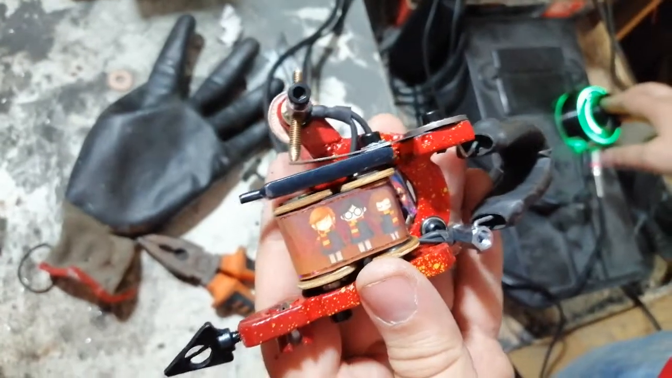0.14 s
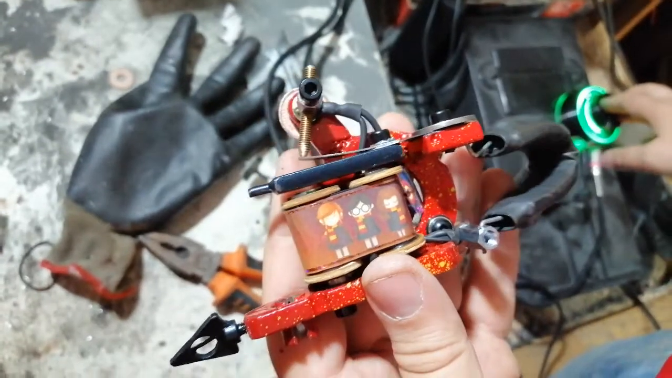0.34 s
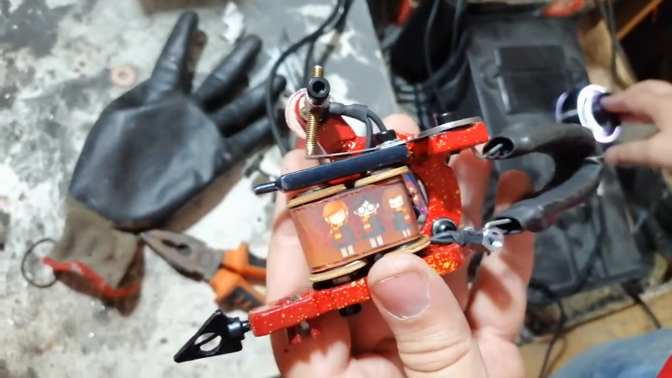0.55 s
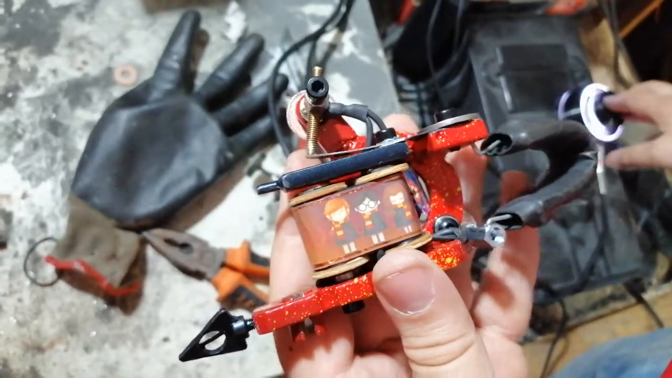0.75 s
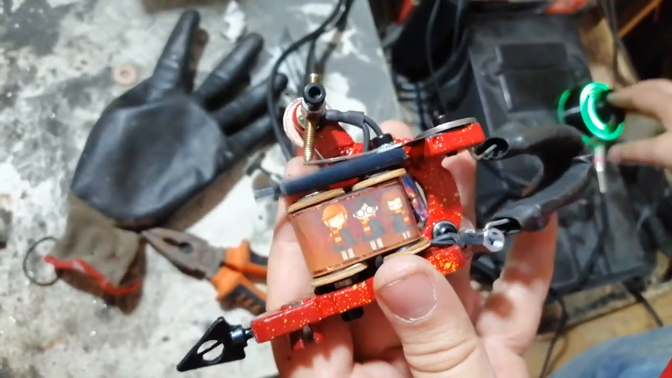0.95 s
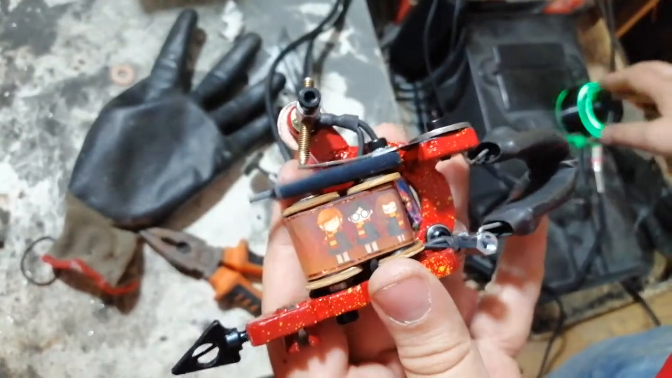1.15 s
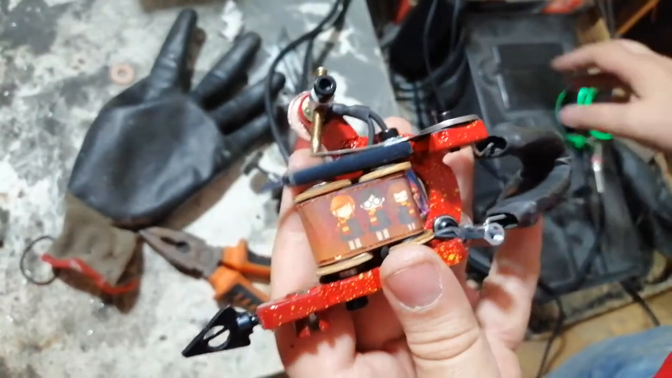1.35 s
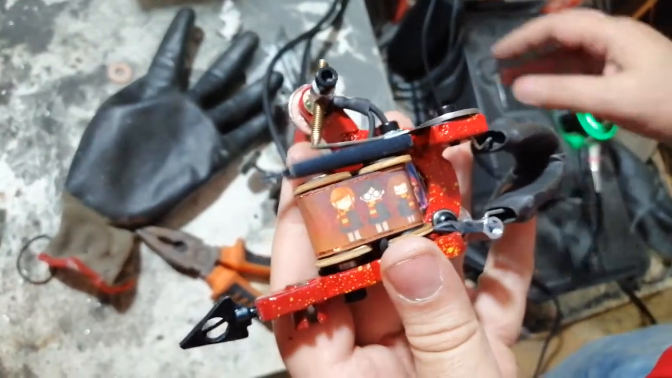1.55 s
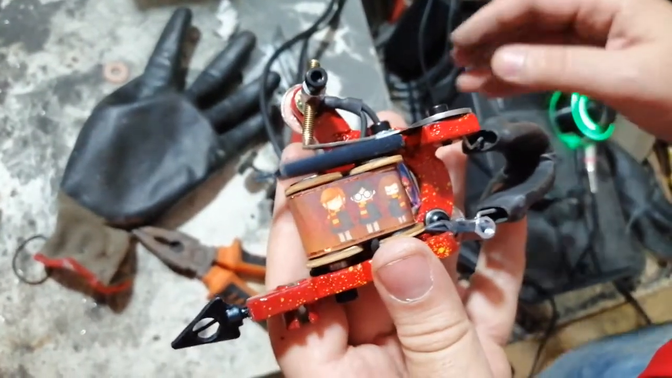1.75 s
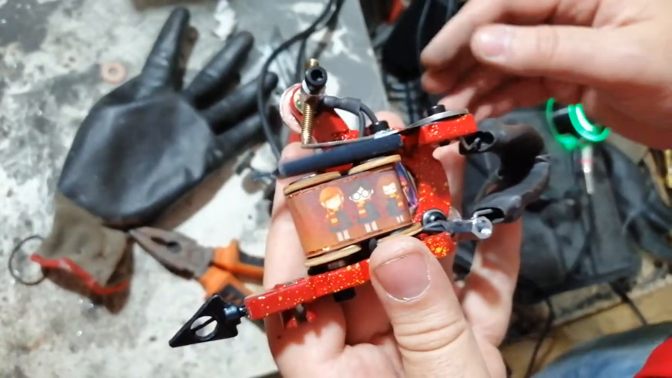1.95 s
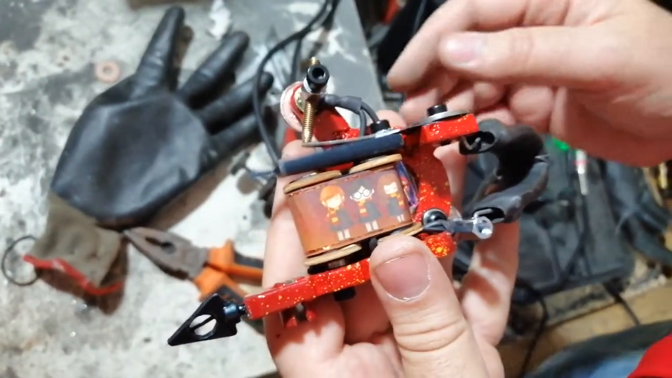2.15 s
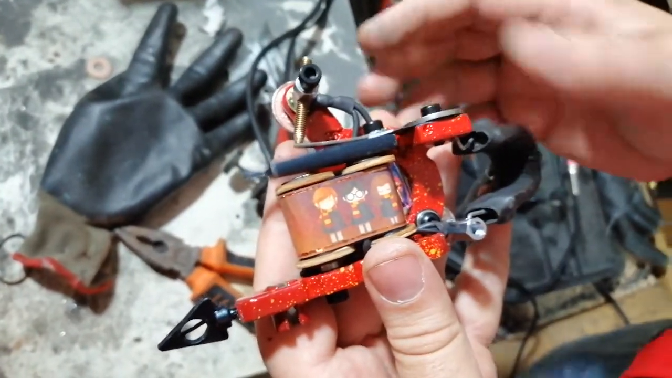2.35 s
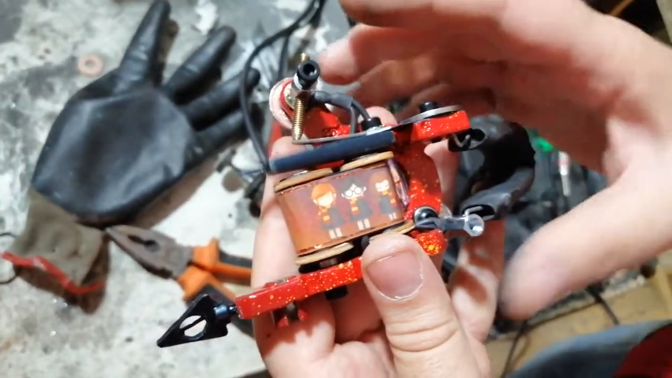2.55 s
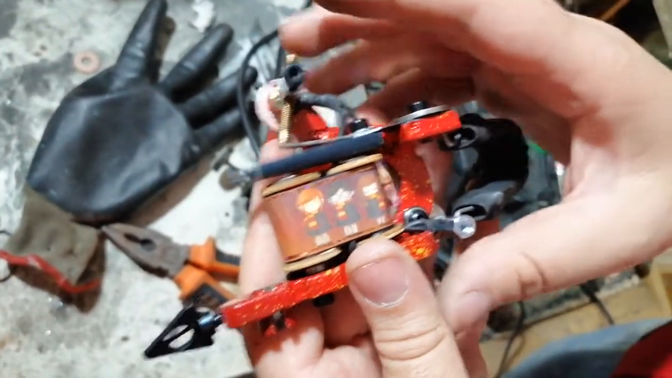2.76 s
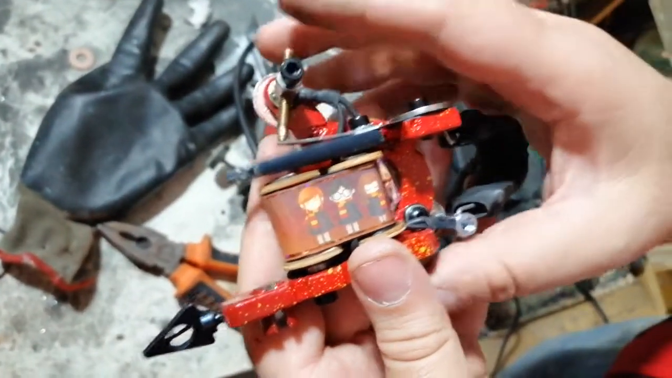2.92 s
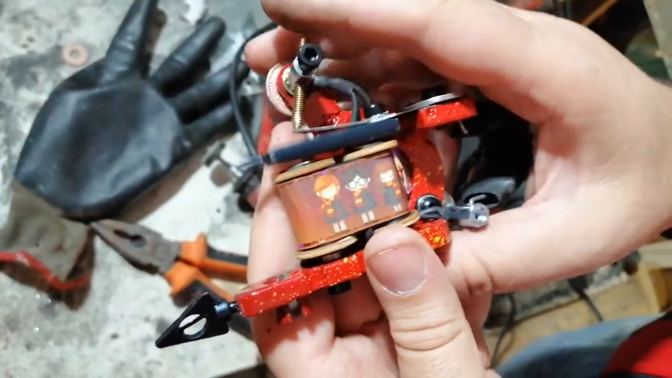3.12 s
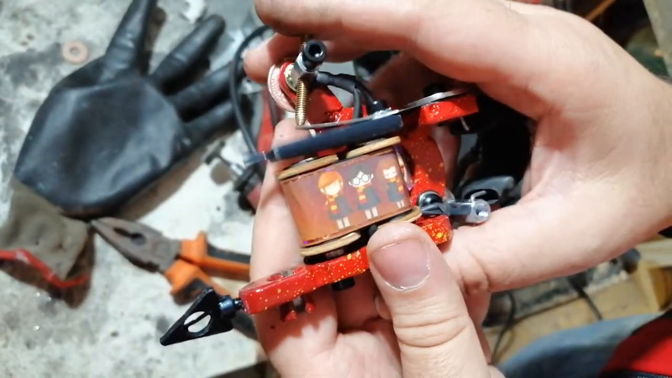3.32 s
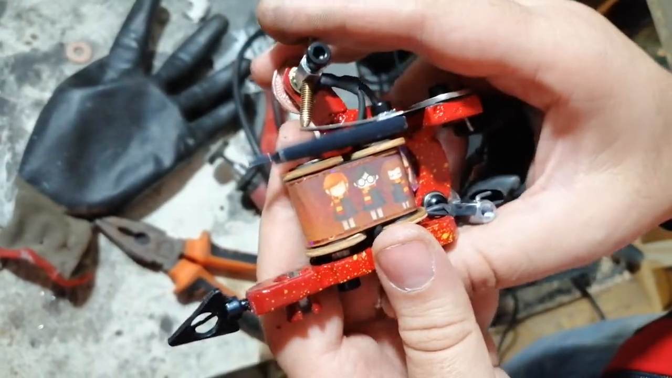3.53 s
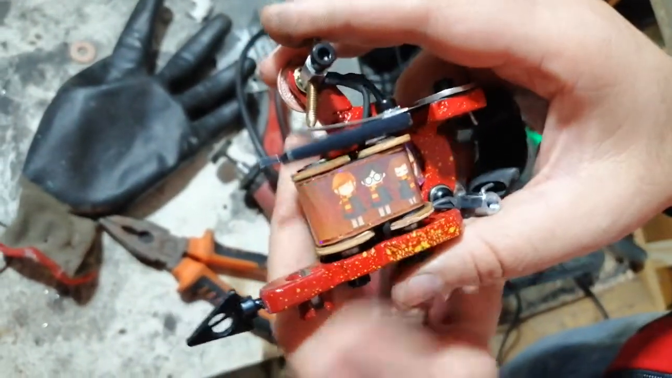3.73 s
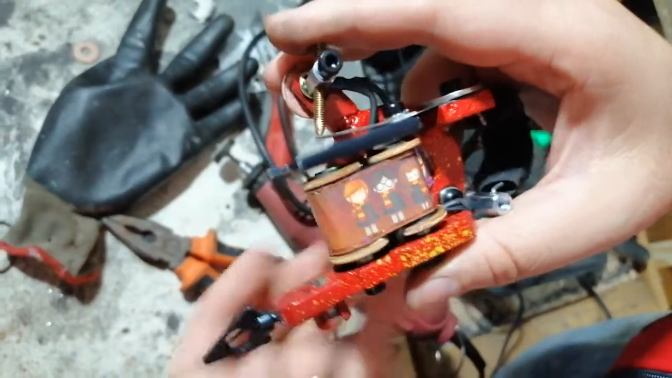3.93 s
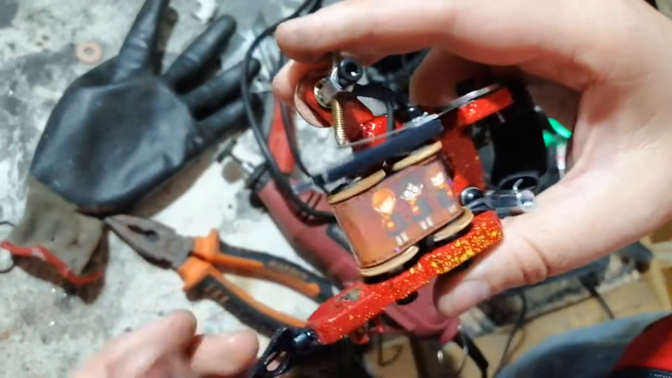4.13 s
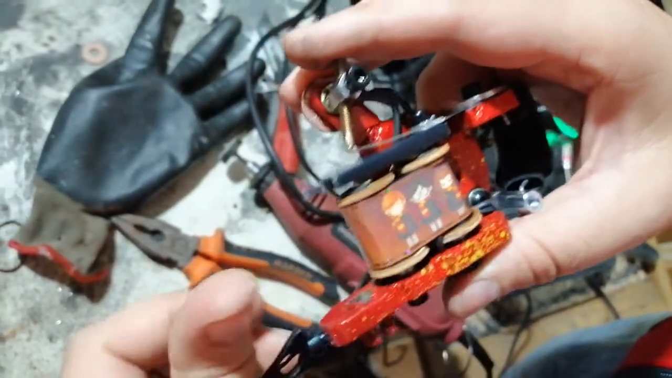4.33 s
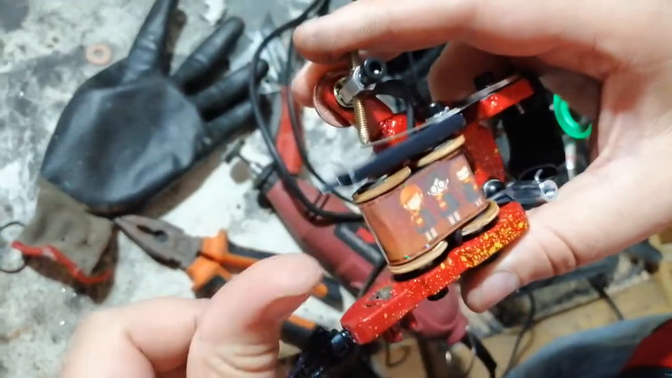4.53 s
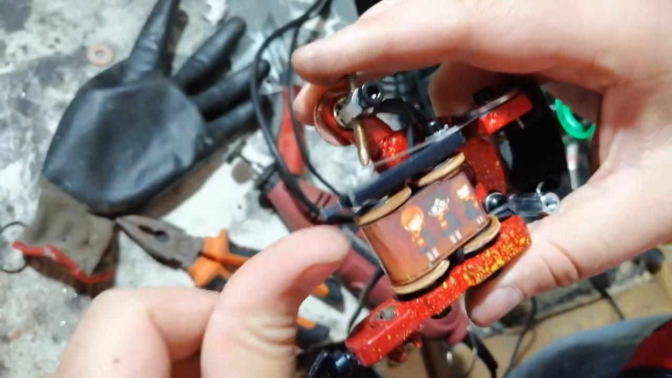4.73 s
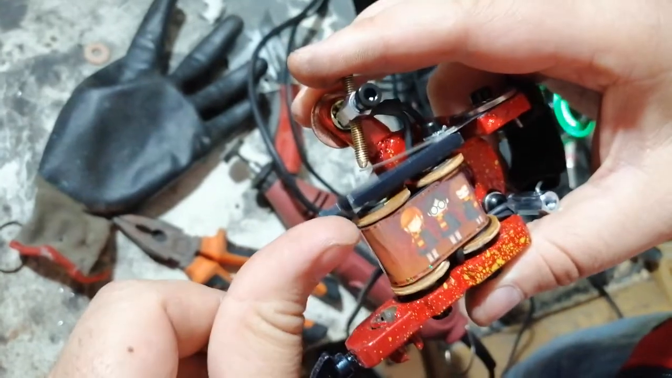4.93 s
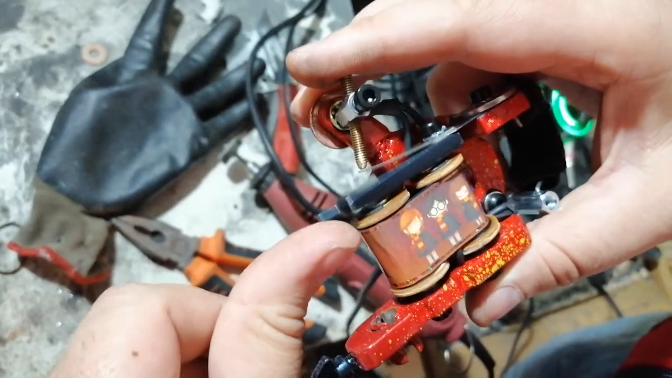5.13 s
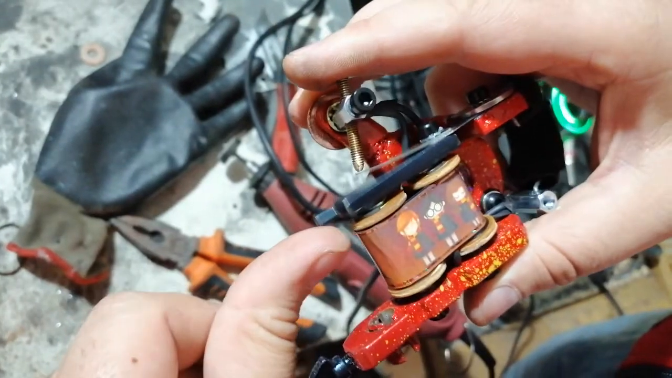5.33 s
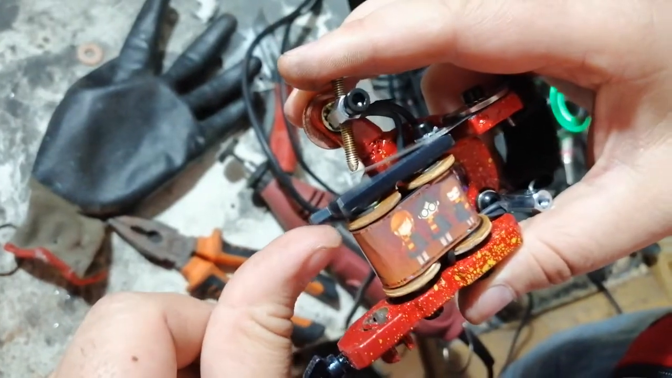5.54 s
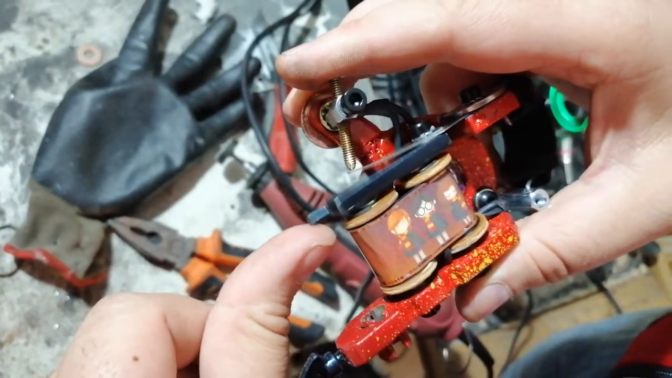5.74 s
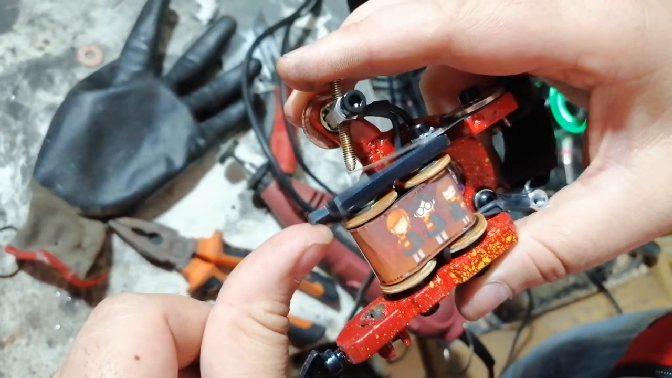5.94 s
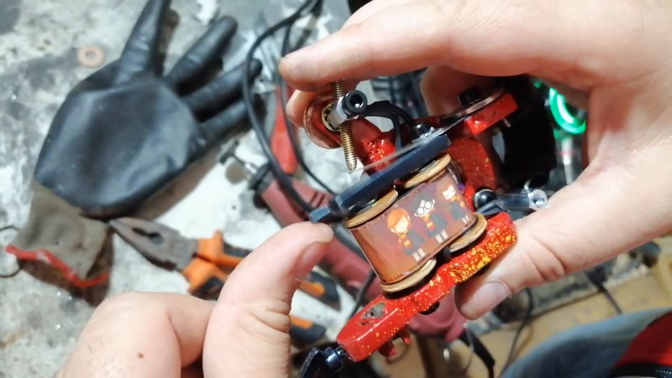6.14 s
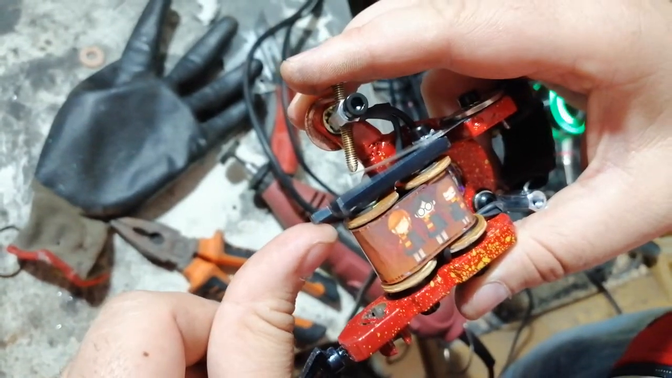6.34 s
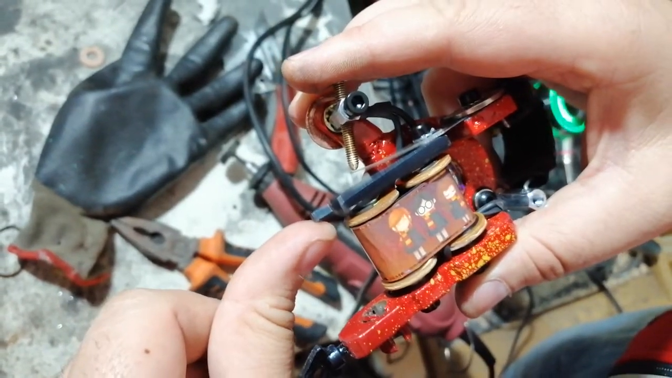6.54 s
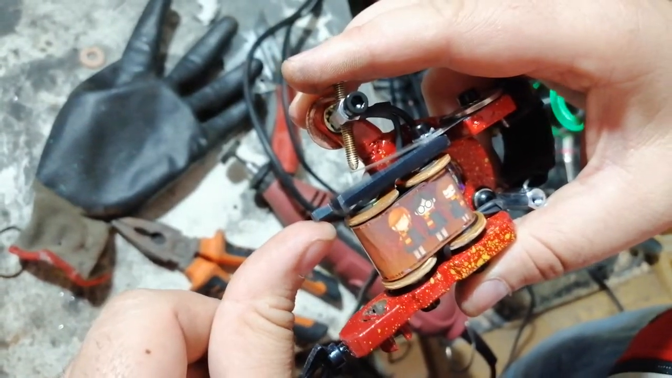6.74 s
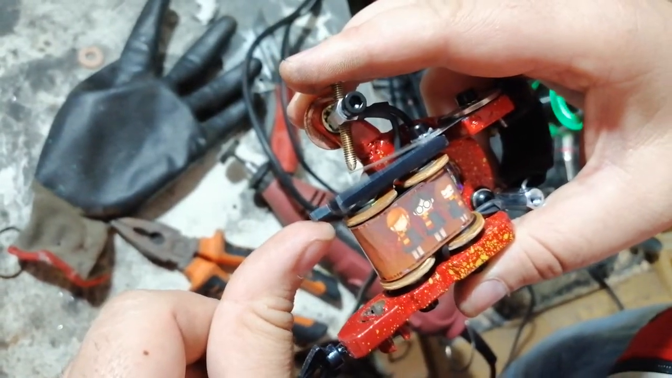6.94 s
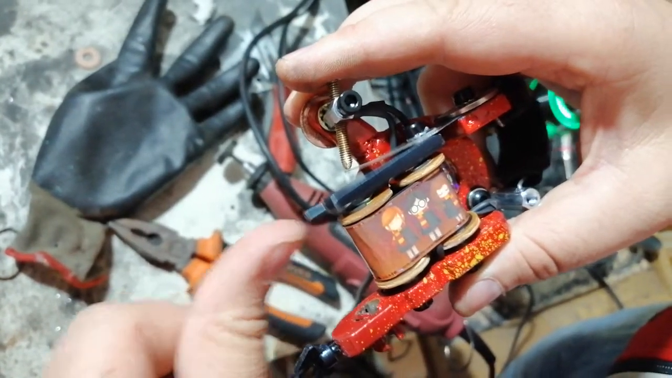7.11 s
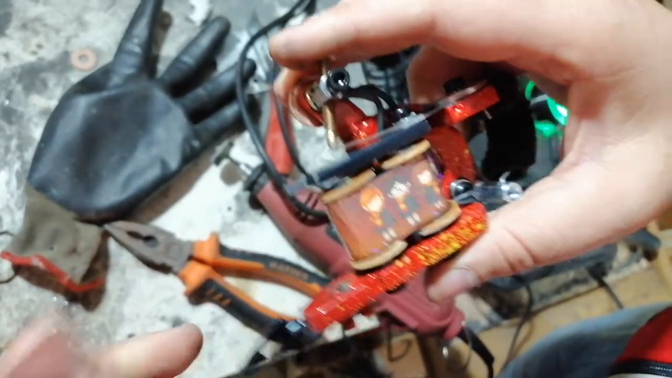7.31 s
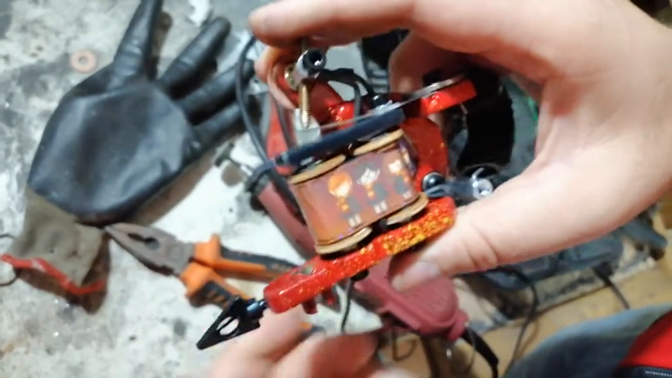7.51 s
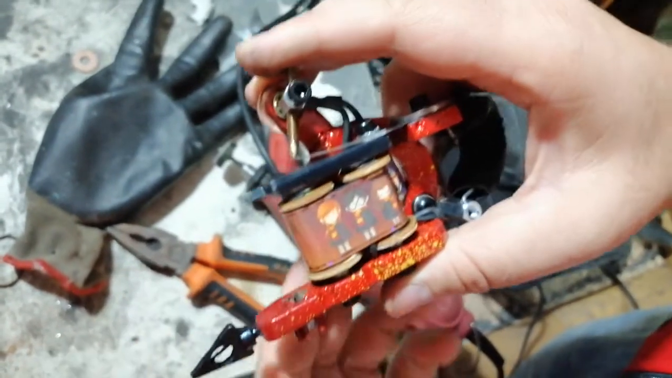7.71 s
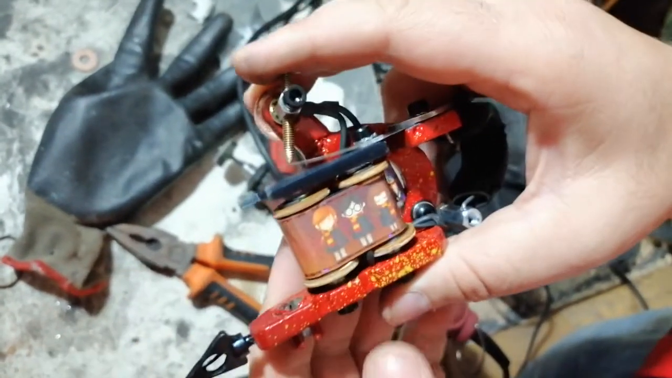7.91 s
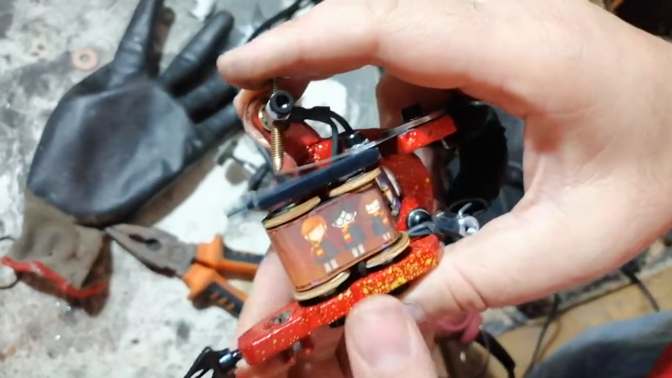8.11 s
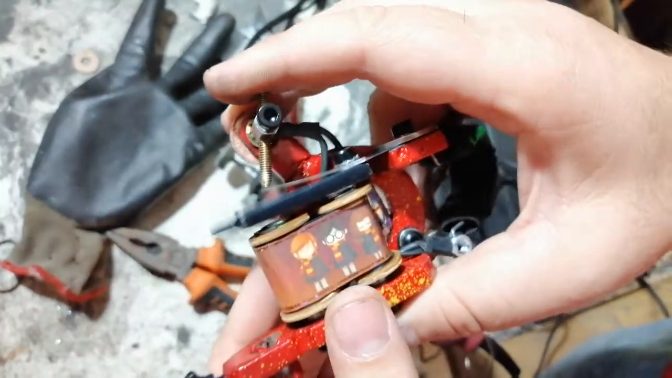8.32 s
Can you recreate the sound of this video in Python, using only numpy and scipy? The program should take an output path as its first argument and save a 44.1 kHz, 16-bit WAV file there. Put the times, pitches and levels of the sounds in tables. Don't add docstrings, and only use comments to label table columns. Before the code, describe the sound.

After soft button clicks, a handheld coil tattoo machine kicks on with a harsh metallic buzz, gets briefly bogged down by a thumb, then recovers.

```python
import sys
import numpy as np
from scipy import signal
from scipy.fft import rfft, irfft, next_fast_len
from scipy.io import wavfile

SR = 44100
rng = np.random.default_rng(int(sys.argv[2]) if len(sys.argv) > 2 else 0)


def digitize_waveform(pressure):
    field = np.atleast_2d(pressure).T
    bounded = np.clip(field, -1, 1)
    quanta = np.round(bounded * 32767).astype(np.int16)
    wavfile.write(sys.argv[1], SR, quanta)


def attenuation_scalar(level_db):
    decades = np.asarray(level_db, float) / 20
    return 10 ** decades


N = 373527
FIRST_BLOW_S = .9822


def machine():
    # (delay [ms], left [dB], right [dB], timing scatter [ms], size scatter [dB])
    contacts = [
        (0, -4.5, -15, 0.003, 1.5),
        (0.221, 3, 16, 0.0023, 0.5),
        (0.411, -9, 7, .004, 2),
        (0.6, 0, -4, 0.01, 2.5),
        (1.205, -0.5, -23, 0.0086, 2),
        (2.652, -2, 5.5, 0.0018, 1),
        (3.497, -4.5, -18, 0.011, 0.5),
    ]
    # (frequency [Hz], width [Hz], left [dB], right [dB], slope [dB per dB of turn])
    clang = [(2123, 390, -13, -21, 1.02), (3777, 345, -3.5, -41, -0.57), (5070, 2100, -16, -32, -2),
             (5690, 230, -21, -16, -1.5), (6947, 730, -39, 6.5, 0), (7810, 490, -2.5, -9, 1.22),
             (9410, 1720, -20, 7, 0.5), (10250, 1260, -11, -1, -.2), (11720, 2100, -4.5, -34, 0.6),
             (13460, 1960, -2, -39, -0.4), (14750, 910, -7.5, -17, 0.5)]
    # (frequency [Hz], width [Hz], left [dB], right [dB], slope [dB per dB of turn])
    frame_rings = [(959.2, 73, -2, 2, 0.36), (1198, 520, -7.5, -2.5, 1.18), (2050, 244, -7.5, 8.5, 0.3),
                   (2756, 180, -1.5, 3, -1), (3506, 28, 6.5, 8, -1.45), (3760, 126, 8.5, -35, 1.34),
                   (4550, 190, -5.5, 7, 0.4), (7290, 87, 12, 24, 0.34), (7518, 275, 11.5, 19, 0.48),
                   (9770, 180, -21, 8, 2.1), (10330, 290, 2, 14, 0.73)]
    # (frequency [Hz], width [Hz], left [dB], right [dB], slope [dB per dB of turn])
    spring = [(11290, 214, 5.5, -10.5, 0.34), (12760, 120, -16, -17, -3), (3657, 116, -8, -22, 0.67)]
    # (frequency [Hz], left [dB], right [dB])
    small_modes = [(102, -4, -7), (1000, -20, -20), (2050, -10.5, -16.5), (2700, -12.5, -10),
                   (3740, -14, -9.5), (5940, -6.5, -12.5), (7250, -3.5, -4), (10980, -0.5, -1.5),
                   (12070, -8.5, -24), (14000, -9, -14), (15000, -10.5, -22), (15100, -14, -28),
                   (16000, -51, -55)]
    # (frequency [Hz], width [Hz], gain [dB])
    palm_hz, palm_width_hz, palm_db = (8790, 1100, 15.2)
    # (start [s], length [s], gain [dB], ramp [s])
    cupping = [
        (2.9, 5.8, 2.5, 0.28),
        (4.05, 1.4, 7, 0.17),
        (7.35, 1.3, 9.5, 0.24),
    ]
    # (start [s], length [s], gain [dB], ramp [s])
    free_spring = [
        (1, 1.78, 6, 0.13),
        (7.3, 1.3, 2.5, 0.11),
    ]
    free_hz = 123.03

    hz, clang_db, pan_db, thump_db, spring_db = motion()
    turn_db = thump_db[0] - thump_db[1]
    stroke_s, stumble_db, phase = strokes(hz)
    chance_time, chance_size = rng.standard_normal((2, len(contacts) + 1, len(stroke_s)))
    load = np.clip(free_hz - hz, 0, 20)
    rush = np.clip(hz - free_hz - 11, 0, 2)
    wobble = 1 + (0.11 * load + 0.75 * rush)[(stroke_s * SR).astype(int)]
    stroke_s = stroke_s + 0.011 * wobble * chance_time[-1] / 1000

    blows = []
    for k, (delay_ms, _, _, time_ms, size_db) in enumerate(contacts):
        when = stroke_s + (delay_ms + time_ms * wobble * chance_time[k]) / 1000
        blows.append(clicks(when, attenuation_scalar(stumble_db + size_db * wobble * chance_size[k])))
    blows[-2] = blows[-2] * attenuation_scalar(spans(free_spring))
    snap = 0.34 * blows[-2] + 1.24 * blows[-1]

    scatter_hz, *scatter_db = np.transpose(small_modes)
    swing = attenuation_scalar(thump_db[1] - 8.5 - 0.72 * load) * walk(4.9, 1.6) * np.sin(phase + 2.97)
    out = []
    for ear, side in enumerate((1, -1)):
        drive = sum(attenuation_scalar(row[1 + ear]) * blow for row, blow in zip(contacts, blows))
        rattle = ring(np.abs(drive), 94, 270) * rng.standard_normal(N)
        scatter = level(posed(drive, 0.013), 0) + level(rattle, -8.5)
        scatter = colour(scatter, scatter_hz, scatter_db[ear])

        steel = level(modes(drive, clang, ear, turn_db, 1.4, order=2), -3.5)
        steel = steel + level(modes(drive, frame_rings, ear, turn_db, 0.49), -11.0)
        steel = steel + level(scatter, -4.5)
        steel = steel + attenuation_scalar(spring_db + 22) * modes(snap, spring, ear, turn_db, 0.43)
        if ear == 0:
            cupped = ring(ring(drive, palm_hz, palm_width_hz), palm_hz, palm_width_hz)
            steel = steel + attenuation_scalar(palm_db + spans(cupping)) * cupped
        steel = signal.lfilter(*signal.butter(2, 520, "high", fs=SR), steel)
        steel = np.roll(steel, ear * int(.00015 * SR))

        push = thump(blows[0] + (.25, .04)[ear] * blows[3] + (.4, .26)[ear] * blows[-2], ear)
        push_db = thump_db[ear] - 0.13 * load + (.2, 1.8)[ear] * rush
        port = attenuation_scalar(2.5 + side * pan_db / 2) * steel - side * attenuation_scalar(push_db) * push + swing
        out.append(attenuation_scalar(clang_db) * port)
    return np.array(out)


def motion():
    # (time [s], clang level [dB], left minus right [dB], thump over clang [dB],
    # turn of the bar's face to the left [dB])
    hold = [(1.0, -44, -7, -14.5, -4.5), (1.055, -42, -6, -12.5, -6.5), (1.1, -42, -2, -15.5, -4.5),
            (1.25, -40.5, -4, -14.5, -7), (1.8, -40, -3, -15.5, -7), (2.5, -39.5, -1.5, -15.5, -7),
            (2.9, -39.5, -0.5, -12.5, -4.5), (3.4, -37.5, 1.5, -14, 2.5), (3.65, -38.5, 2.5, -14, 2.5),
            (3.9, -41.5, 2, -11, 2.5), (4.5, -41.5, 2, -12.5, 6), (5.2, -41, 1, -12.5, 2),
            (5.8, -42, 2.5, -17, 4.5), (6.5, -41, 2.5, -18.5, 5), (7.0, -42, 1.5, -19.5, 5),
            (7.3, -40.5, 1, -11.5, 3.5), (7.7, -40.5, -1.5, -13.5, -1.5), (7.9, -38.5, -3, -15.5, -4.5),
            (8.2, -39.5, -2.5, -13.5, -3), (8.47, -41, -6, -12.5, 8)]
    # (start [s], length [s], drop in stroke rate [Hz], ramp [s])
    brakes = [(3.68, .44, .7, 0.16), (5.46, .07, 1.9, .05), (5.62, 1.6, 2.7, 0.095), (5.75, .09, 5, 0.044),
              (6.022, .025, 2.5, 0.016), (6.155, .04, 3.2, 0.034), (6.365, .1, 4.5, 0.06),
              (6.37, .175, 4.3, 0.029), (6.945, .11, 5, 0.04), (7.05, .05, 1.5, .02), (7.11, .11, 8, 0.028),
              (8.33, .3, 1.8, 0.21)]
    # (start [s], length [s], loss [dB], ramp [s])
    muffles = [
        (.9, 0.27, 17, 0.17),
        (1.33, 0.078, 10, .1),
        (2.68, 0.97, 24, 0.13),
        (3.2, 1.33, -1, .2),
        (4.88, 0.17, 15, 0.15),
        (7.3, 3.9, 2, .15),
    ]
    # (rate [times a second], depth [Hz])
    tremors = [(1.3, .15), (2.899, 0.158), (7.302, 0.13)]
    thumb = [(5.33, 1.94, 5, 0.29)]
    run_hz, stall_hz = 120.58, 7.4

    since = np.clip(np.arange(N) / SR - FIRST_BLOW_S, 0, None)
    level_db, pan_db, push_db, turn_db = curves(hold)
    brake = spans(brakes)
    rush_hz = 13 * np.clip(1 - (since - .08) / .14, 0, 1)
    warm_hz = 2.2 * np.clip(1 - (since - .42) / .15, 0, 1)
    hz = run_hz + rush_hz + warm_hz - brake
    hz = hz + sum(depth_hz * np.sin(2 * np.pi * rate * since) for rate, depth_hz in tremors)
    clang_db = level_db - 0.4835 * brake - np.clip(brake - stall_hz, 0, None)
    spring_db = 3.5 + 0.78 * brake + spans(thumb) - spans(muffles)
    return hz, clang_db, pan_db, (push_db + turn_db / 2, push_db - turn_db / 2), spring_db


def strokes(hz):
    # (time [s], level over its neighbours [dB]); the first row sets the beat
    stumbles = [
        (7.1855, 0),
        (7.16, -12),
        (7.168, -10),
        (7.177, -7),
        (7.195, -9),
        (7.204, -5),
        (7.2125, -2),
    ]
    t = np.arange(N) / SR
    turns = np.cumsum(hz * (t >= FIRST_BLOW_S)) / SR
    beat = np.interp(stumbles[0][0], t, turns)
    turns = turns * np.round(beat) / beat
    s = np.interp(np.arange(int(turns[-1])), turns, t)
    s[0] = FIRST_BLOW_S
    stumble_db = np.zeros(len(s))
    for when, db in stumbles:
        stumble_db[np.argmin(abs(s - when))] = db
    return s, stumble_db, 2 * np.pi * turns


def modes(drive, table, ear, turn_db, drift_db, order=1):
    step = 32
    out = 0
    for k, (hz, width_hz, *db) in enumerate(table):
        mode = ring(drive, hz, width_hz)
        if order > 1:
            mode = ring(mode, hz, width_hz)
        sign = (-1) ** (k // (1 + ear))
        gain = np.repeat(attenuation_scalar(db[ear] + db[-1] * turn_db[::step]), step)[:N]
        out = out + sign * gain * walk(1.824, drift_db) * mode
    return out


def posed(drive, t60_s):
    poses = 14
    patterns = decay(t60_s, .03, count=poses + 1)
    hop = N // poses + 1
    fade = np.sin(np.pi * np.arange(2 * hop) / (2 * hop))
    padded = np.pad(drive, (hop, 2 * hop))
    out = np.zeros(N + 4 * hop)
    for k, pattern in enumerate(patterns):
        heard = signal.oaconvolve(padded[k * hop:(k + 2) * hop] * fade, pattern)
        out[k * hop:k * hop + len(heard)] += heard
    return out[hop:hop + N]


def thump(drive, ear):
    # (frequency [Hz], left [dB], right [dB])
    air = [(30, -30, -30), (70, -33, -17), (120, 6, 5.5), (265, 2.5, 2.5), (457, 4.5, 0), (765, -2, 0.5),
           (1290, -3.5, -6), (1930, -15.5, -17.5), (3600, -17.5, -62)]
    hz, *db = np.transpose(air)
    lag = int((.00048, .00062)[ear] * SR)
    return level(np.roll(colour(drive, hz, db[ear]), lag), 0)


def shared_bands(pair):
    # (start [s], length [s], frequency [Hz], width [Hz], gain [dB])
    band_changes = [(0.99, .17, 6000, 600, -8), (1.05, 0.47, 5200, 850, -11), (1.03, 0.58, 2600, 170, 0),
                    (1.21, 0.23, 3460, 190, -19), (1.2, 1.2, 2940, 510, -32), (1.52, .5, 3250, 200, -25),
                    (2.45, 0.4, 3300, 200, -10), (1.48, 1.05, 2400, 280, -13), (1.4, 1.3, 5300, 1100, -4.5),
                    (1.5, 1.6, 4320, 170, -14), (3.1, 0.096, 2800, 700, -18), (3.2, .45, 3300, 130, -18),
                    (3.6, 0.603, 4000, 1800, 3), (2.7, 1.14, 5900, 570, -4), (3.87, .22, 2800, 1200, -18),
                    (4.7, 1.6, 3630, 140, -6), (5.3, 2.7, 2640, 140, -8), (2.6, 4.2, 4100, 200, -4),
                    (2.5, 1.3, 3600, 180, -5), (4.2, .9, 6800, 1300, -1.5), (7.25, 0.17, 5300, 1500, -10),
                    (10, .5, 2450, 220, -8), (7.7, 0.38, 3460, 300, -8), (8.0, .6, 4100, 460, -21),
                    (7.75, .9, 2860, 1140, 4), (7.3, 0.84, 3900, 280, -1), (1, 1.6, 6470, 300, -5.5),
                    (2.3, 1.5, 3750, 82, -3), (7.9, .7, 4650, 210, 6), (2.1, .63, 2930, 200, -16),
                    (4.6, 1.17, 4930, 140, -8), (6.2, 1.4, 4520, 160, 5), (7.1, 0.74, 6300, 1500, 4),
                    (2.7, 0.87, 3360, 160, -13), (1.48, 0.98, 4500, 180, -5), (3.7, .8, 5120, 400, -5),
                    (1.1, .4, 9100, 1500, 2.5), (0.98, 1.72, 7240, 230, 4), (3.8, 1.9, 7670, 280, 4),
             (5.3, 3.2, 7400, 160, -7), (7.5, .9, 7700, 400, 4.5), (2.22, 1.4, 9900, 360, -5),
             (1.78, 1.38, 9400, 390, 5), (2.4, .8, 11400, 600, 4.5), (2.4, 1.37, 7900, 430, -5),
             (6, 1.2, 13650, 520, 5.5), (5.3, 1.2, 13200, 400, -3), (3.6, 1.6, 14300, 400, -4),
             (7.3, .9, 8020, 530, 4), (5.5, 1.47, 10400, 300, 2.5), (3, 1.42, 11300, 800, -2.5),
             (1, 1.5, 12700, 250, -4), (1, 2.5, 14000, 300, 1), (4.3, 0.99, 8800, 1200, 3),
             (7.2, 1.3, 12600, 500, 5), (7.6, .9, 12000, 350, -5),
                    (2.66, 1.08, 890, 230, -4.5), (3.4, 0.39, 720, 110, -24), (3.8, 0.48, 830, 160, 7),
            (4.7, 0.6, 725, 150, -13), (3.13, 4.2, 510, 130, 0), (4.5, 0.67, 260, 43, 0),
            (5.85, .5, 226, 120, -11), (6.57, 0.31, 280, 290, -22), (7.2, 2.8, 388, 33, -2),
            (7.25, 0.94, 620, 83, 6), (7.244, 0.92, 1470, 510, 3.5), (2.74, 2.24, 1220, 350, 3.5),
            (6.7, 2.8, 930, 100, 3.5), (5.5, 1.26, 1500, 340, 0), (7.8, .8, 900, 280, -8),
            (1.2, 1.5, 240, 37, 2), (1.22, 1.46, 480, 110, -1), (1.507, 1.255, 596, 59, 9.5),
            (2.75, .45, 360, 57, -12), (3.2, 2.62, 640, 85, 6), (7.9, 0.53, 480, 81, -4),
            (4.9, 0.71, 240, 72, 4.5), (3.9, 0.88, 1600, 160, 6), (2.02, 1.2, 1205, 105, 5.5),
            (4.2, 1.58, 845, 77, 5), (1.49, 1.59, 1020, 160, 2), (6.7, .7, 150, 80, -4),
            (.97, .12, 1000, 1300, 2), (5.9, 1.03, 1080, 99, 3.5), (5.55, .8, 710, 95, -3.5),
            (6.2, 1.4, 1980, 130, 0.5)]
    ramp_s = .08
    mid = pair.mean(axis=0)
    both, t = mid.copy(), np.arange(N) / SR
    for s, length_s, hz, width_hz, db in band_changes:
        part = slice(int((s - .1) * SR), int((s + length_s + ramp_s) * SR))
        ramp = np.clip(np.minimum(t[part] - s, s + length_s - t[part]) / ramp_s + .5, 0, 1)
        both[part] += (attenuation_scalar(db) - 1) * ramp * ring(both[part], hz, width_hz)
    return pair + both - mid


def switch():
    # (time [s], knock [dB], tick [dB], left minus right [dB])
    touches = [(0.239, -64, -82, -1), (.265, -68, -82, 1), (0.5422, -64, -66, -3), (0.8203, -44.5, -70, -2),
               (.885, -59, -76, -6.5), (0.967, -80, -44, 5), (.974, -67, -31.5, 2), (2.71, -50.5, -63, 13),
               (4.512, -52, -60, 3), (4.601, -58, -60, 2), (4.758, -51, -60, 11), (5.169, -52, -64, 4)]
    # (frequency [Hz], width [Hz], level [dB])
    plastic = [(180.4, 56, 1.5), (406, 77, 10), (735, 330, -8.5), (1080, 220, 0.5), (1650, 200, -7),
               (4390, 1200, -14)]
    s, knock_db, tick_db, pan_db = np.transpose(touches)
    out = []
    for side in (1, -1):
        contact = clicks(s, attenuation_scalar(knock_db + side * pan_db / 2))
        hit = signal.oaconvolve(contact, decay(0.16, 0.16, count=1)[0])[:N]
        hit = hit + 7 * contact
        hit = ring(hit, 700, 3400)
        tick = clicks(s, attenuation_scalar(tick_db + side * pan_db / 2))
        tick = signal.oaconvolve(tick, decay(0.017, .015, count=1)[0])[:N]
        knock = sum(attenuation_scalar(db + 0.5) * ring(hit, hz, width_hz) for hz, width_hz, db in plastic)
        out.append(knock + ring(ring(tick, 8400, 7000), 9400, 7000))
    return np.array(out)


def shop():
    # (frequency [Hz], density [dB per Hz])
    room_hiss = [(15, -30), (25, -10), (59, -30), (211, -19), (292, -11), (343, -18), (2740, -29),
                 (2970, -28), (15800, -47)]
    room_db = -77.5
    hz, db = np.transpose(room_hiss)
    t = np.arange(N) / SR
    hiss = level(colour(rng.standard_normal((2, N)) * walk(8.2, 2.9), hz, db), room_db + 0.5)
    rumble = level(ring(ring(rng.standard_normal(N), 118, 110), 43, 120), room_db) * walk(9, 0.97)
    bump = ring(ring(rng.standard_normal(N), 150, 150), 150, 150)
    bump = 12 * attenuation_scalar(-70.0) * bump * np.exp(-((t - .57) / 0.03) ** 2)
    thud = attenuation_scalar(-8) * ring(clicks(np.array([FIRST_BLOW_S]), np.ones(1)), 68, 53)
    return hiss + rumble + bump + thud


def level(x, db):
    return x * attenuation_scalar(db) / np.sqrt(np.mean(x ** 2))


def curves(table):
    s, *columns = np.transpose(table)
    return [np.interp(np.arange(N) / SR, s, c) for c in columns]


def spans(rows):
    t = np.arange(N) / SR
    total = 0
    for s, length, depth, ramp in rows:
        total = total + depth * np.clip(np.minimum(t - s, s + length - t) / ramp + .5, 0, 1)
    return total


def ring(x, hz, width_hz):
    return signal.lfilter(*signal.iirpeak(hz, hz / width_hz, SR), x)


def colour(x, hz, db):
    size = next_fast_len(x.shape[-1])
    f = np.log(np.arange(size // 2 + 1) * SR / size + 1)
    return irfft(rfft(x, size) * attenuation_scalar(np.interp(f, np.log(hz), db)), size)[..., :x.shape[-1]]


def walk(rate, spread_db):
    knots = rng.standard_normal(int(N / SR * rate) + 2)
    return np.interp(np.arange(N), np.arange(len(knots)) * SR / rate, attenuation_scalar(spread_db * knots))


def clicks(s, size):
    at = s[s < N / SR - .001] * SR
    taps = np.floor(at)[:, None] + np.arange(-7, 9)
    offset = taps - at[:, None]
    shape = np.sinc(offset) * np.cos(np.pi * offset / 16) ** 2
    return np.bincount(taps.astype(int).ravel(), (shape * size[:len(at), None]).ravel(), N)


def decay(t60_s, length_s, count):
    t = np.arange(int(length_s * SR)) / SR
    return rng.standard_normal((count, len(t))) * np.exp(-np.log(1000) * t / t60_s)


def scene():
    room_t60_s, room_db = 0.18, -19
    near = machine() + switch()
    tail = decay(room_t60_s, .4, count=2)
    tail = colour(tail, [100, 1000, 8000, 15000], [5.5, 2.5, 2.0, -48])
    tail = tail / np.sqrt(np.sum(tail ** 2, axis=1, keepdims=True))
    wet = signal.oaconvolve(near, tail, axes=1)
    wet = np.pad(wet, ((0, 0), (int(.004 * SR), 0)))[:, :N]
    return shared_bands(near + attenuation_scalar(room_db) * wet + shop())


def roll_off(x):
    return signal.sosfilt(signal.butter(12, 15830, fs=SR, output="sos"), x)


def record(dry):
    mix = signal.sosfilt(signal.butter(6, 15500, fs=SR, output="sos"), dry)
    mix = signal.lfilter(*signal.butter(1, 22, "high", fs=SR), mix)
    return roll_off(mix)


dry = scene()
out = record(dry)
digitize_waveform(out)
```